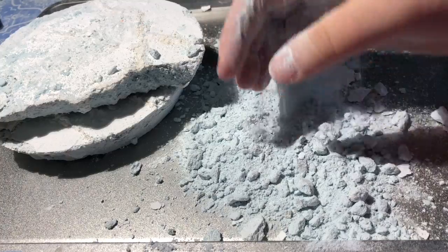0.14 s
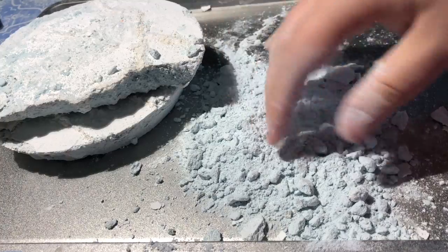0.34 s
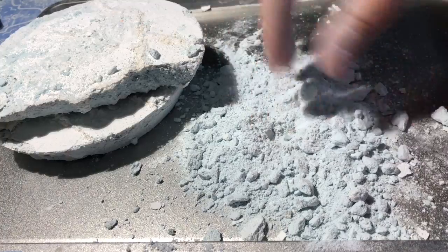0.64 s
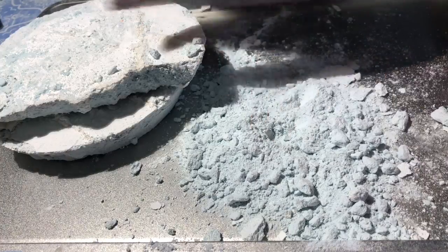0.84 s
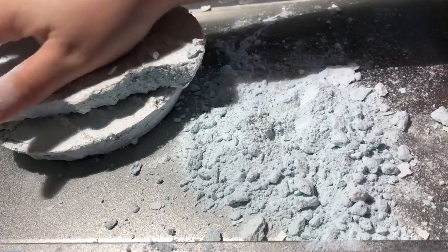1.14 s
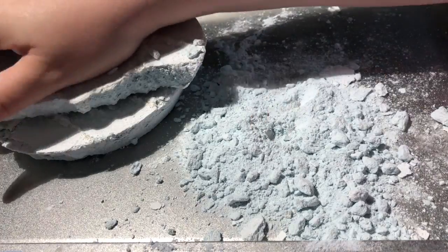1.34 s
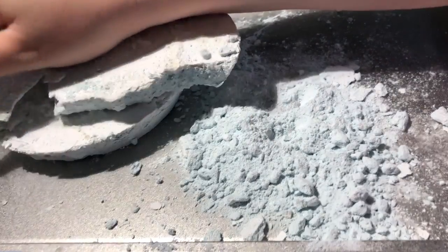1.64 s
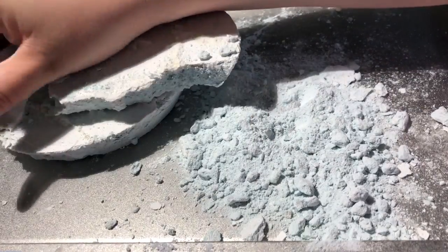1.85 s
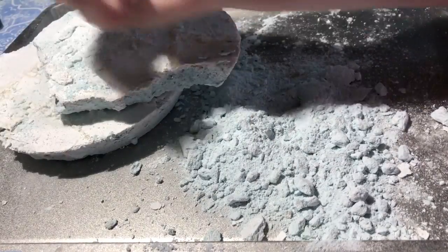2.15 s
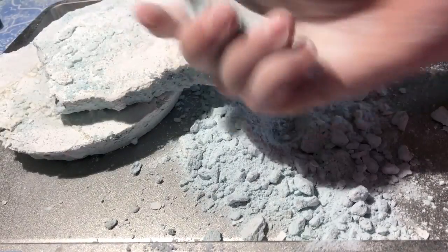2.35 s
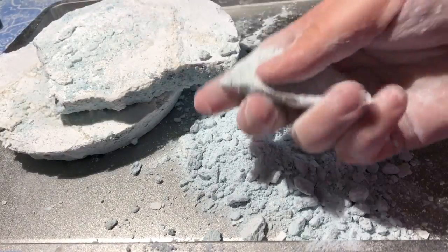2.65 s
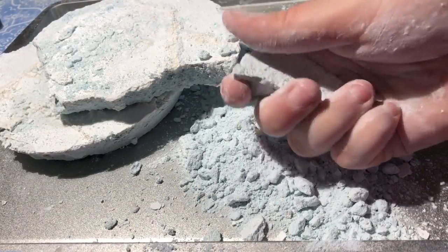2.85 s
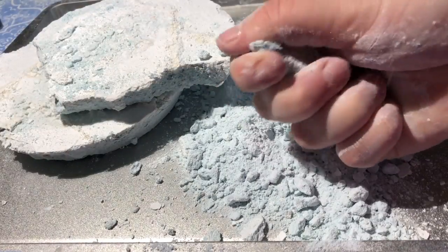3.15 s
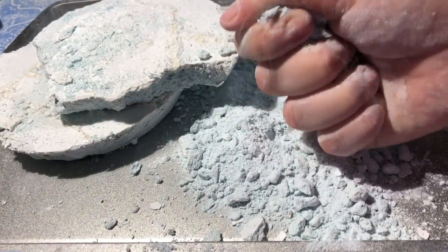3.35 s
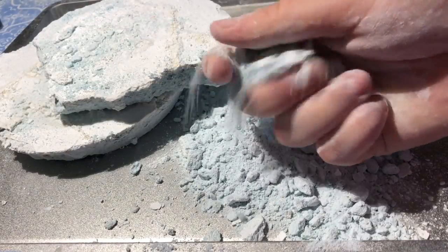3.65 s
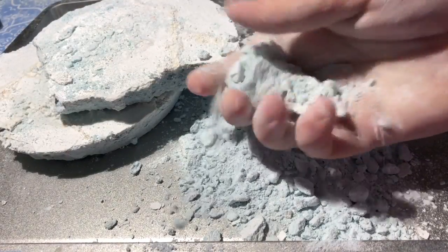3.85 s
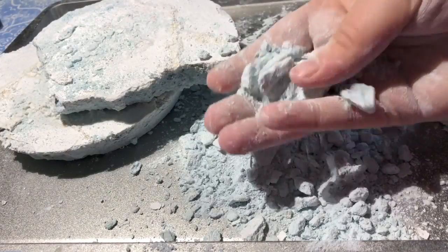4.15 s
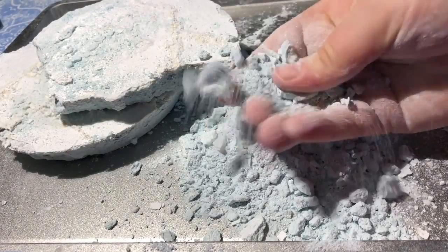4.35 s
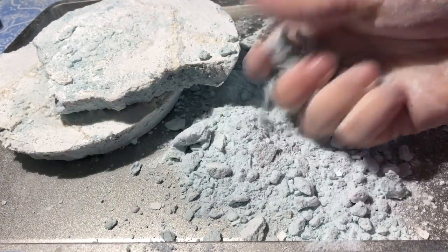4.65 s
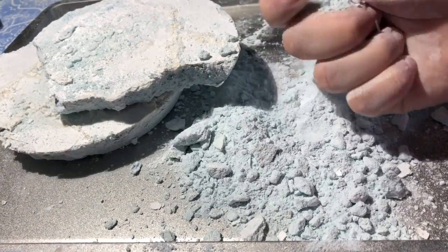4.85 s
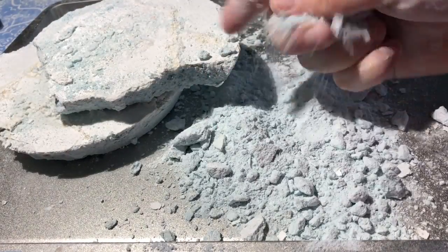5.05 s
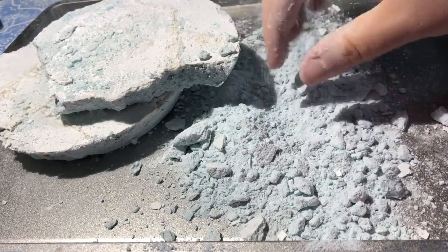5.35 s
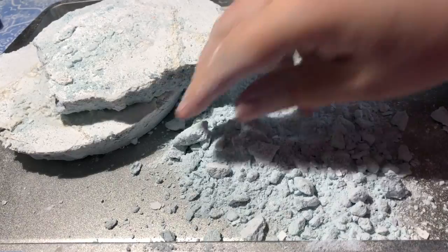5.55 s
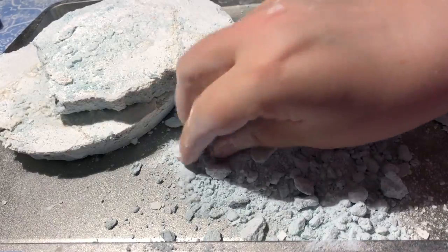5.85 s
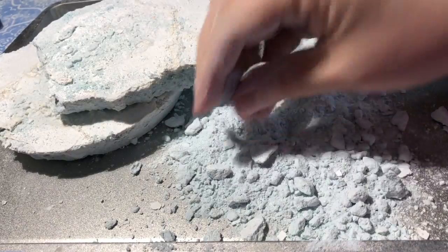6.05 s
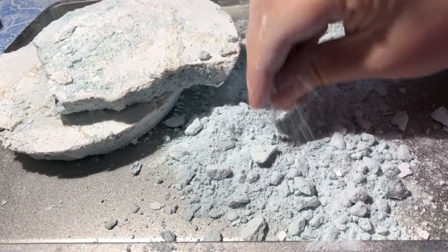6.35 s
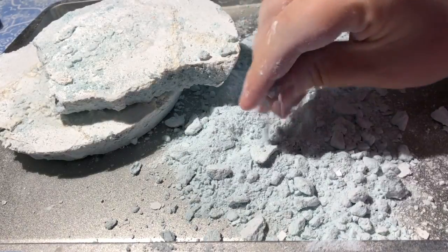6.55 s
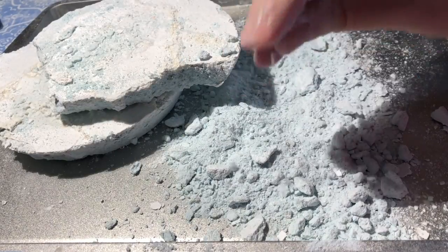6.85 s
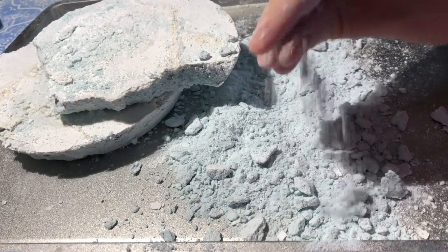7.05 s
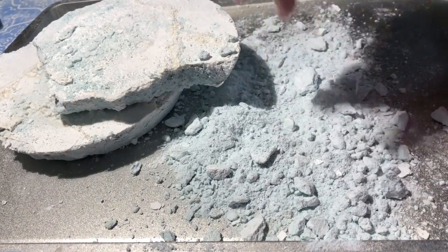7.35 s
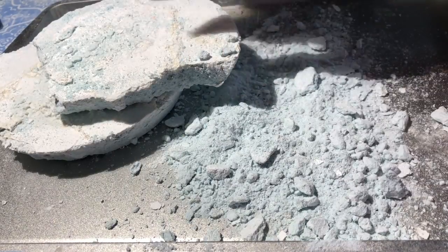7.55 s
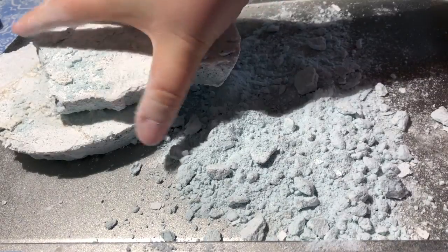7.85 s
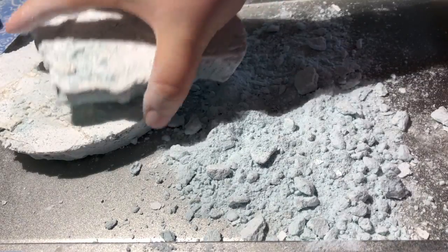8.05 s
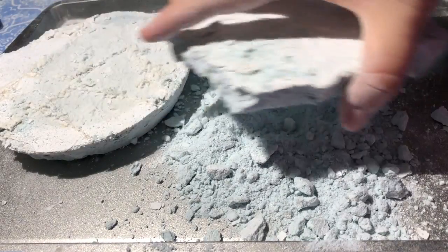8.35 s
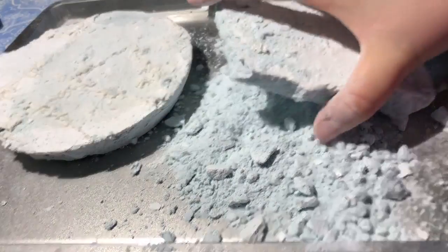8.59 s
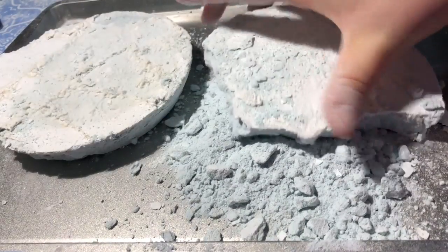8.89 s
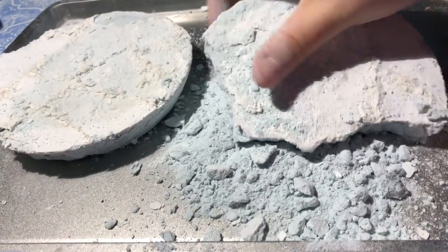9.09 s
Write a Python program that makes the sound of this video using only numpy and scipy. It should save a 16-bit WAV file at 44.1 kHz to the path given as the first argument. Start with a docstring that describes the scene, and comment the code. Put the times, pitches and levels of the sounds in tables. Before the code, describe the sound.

Hands lift, crush and crumble a slab of dry pressed powder over a metal tray, with gritty crunches, pattering crumbs and sharp knocks.

```python
"""At a metal tray in a small room, microphone just over it: hands lift a slab of dry pressed powder, snap and crush it.
Powder hisses on the skin and in the cupped fist: noise of fine grains through the resonances of the hand's hollow.
Crumbs crack, drop and knock: crumbling shocks through broad resonances, with treble chips and a ring of the tray.
Pours and drags are streams of grains, coarse and fine, over a low shudder; the slab's weight thumps low tray modes.
The room's echo and its low steady noise lie underneath."""
import sys
import numpy as np
from scipy import signal
from scipy.fft import rfft, irfft
from scipy.io import wavfile
from scipy.ndimage import uniform_filter1d

SR = 44100
rng = np.random.default_rng(int(sys.argv[2]) if len(sys.argv) > 2 else 0)


def to_wav(sig):
    """Store sig (one row per channel, or 1-D mono) as 16-bit WAV at the path in sys.argv[1].

    Samples outside -1..1 are clipped; the rate is SR.
    """
    pcm = np.clip(np.atleast_2d(sig), -1, 1) * 32767
    pcm = np.round(pcm).astype(np.int16)
    wavfile.write(sys.argv[1], SR, pcm.T)  # frames by channels


N = 406587
TIME = np.arange(N) / SR


def amp(db):
    """Decibels to gain."""
    return 10 ** (np.asarray(db) / 20)


def evened(x):
    """Scales to rms 1."""
    return x / np.sqrt(np.mean(x ** 2) + 1e-20)


def levelled(sound, db, over_s):
    """Gives a short sound the energy of a level db held for over_s."""
    return amp(db) * sound / np.linalg.norm(sound) * np.sqrt(over_s * SR)


def read(points, hz):
    """Reads a spectrum table on a log-frequency axis."""
    f, value = np.transpose(points)
    return np.interp(np.log(hz + 1), np.log(f), value)


def add(mix, s, sound):
    """Mixes a sound in at time s."""
    part = mix[max(round(s * SR), 0):][:len(sound)]
    part += sound[:len(part)]


def during(span):
    """1 within a span of time, 0 outside, with soft edges."""
    inside = (TIME > span[0]) & (TIME < span[1])
    return uniform_filter1d(1. * inside, size=1024)


def stroke(length, rise, growth_db, release):
    """Envelope of one movement: it rises, holds while growing or easing, and dies away."""
    t = np.arange(0, length + 6 * release, 1 / SR)
    hold = amp(growth_db * (np.minimum(t / length, 1) - .5))
    return np.minimum(t / rise, 1) * hold * np.exp(-np.maximum(t - length, 0) / release)


def waver(depth_db, per_s):
    """An unsteady gain: random levels at per_s points a second, joined by straight lines in dB."""
    knots = np.arange(0, N / SR + 1, 1 / per_s)
    return amp(depth_db * np.interp(TIME, knots, rng.standard_normal(len(knots))))


def grains(per_s, spread_db):
    """A random train of clicks, most small and a few large, at rms 1."""
    size = amp(spread_db * np.minimum(rng.exponential(1, N), 4))
    sign = rng.choice([-1, 1], N)
    return evened(size * sign * (rng.random(N) < per_s / SR))


def patchy(x, depth_db, size=512):
    """Lets the colour drift from moment to moment as the points of contact change."""
    z = signal.stft(x, nperseg=size)[2]
    across_pitch = uniform_filter1d(rng.standard_normal(z.shape), size=9, axis=0)
    drift = evened(uniform_filter1d(across_pitch, size=7, axis=1))
    return signal.istft(z * amp(depth_db * drift), nperseg=size)[1][:N]


def colour(x, spectrum, extra_db=0, size=4096):
    """Causal filter: attacks stay sharp and the ringing comes after them."""
    log_gain = np.log(amp(read(spectrum, abs(np.fft.fftfreq(size, 1 / SR))) + extra_db))
    taps = np.fft.ifft(np.exp(np.conj(signal.hilbert(log_gain)))).real  # minimum phase
    return signal.fftconvolve(x, taps[:size // 2])[:len(x)]


def resonate(x, hz, width):
    """A double resonance of gain 1 whose pitch can follow a curve."""
    turn = np.exp(2j * np.pi * np.cumsum(hz * np.ones(len(x))) / SR)
    r = np.exp(-np.pi * width / SR)
    # shift the pitch to zero, smooth twice, shift back
    smooth = signal.lfilter([(1 - r) ** 2], np.poly([r, r]), x / turn + 1e-18)
    return 2 * (turn * smooth).real


def ringing(modes, t):
    """Dying sines of unit energy."""
    sound = sum(amp(db - 60 * t / t60) * np.sin(2 * np.pi * (hz * t + rng.random())) for hz, db, t60 in modes)
    return sound / np.linalg.norm(sound)


def crumble(length, first=0, size=2048):
    """A first shock and a run of tiny fractures that swells and dies, with even power at all pitches."""
    t = np.arange(size) / SR
    swell = (1 - np.exp(-t / 0.00052)) * np.exp(-(t / max(1.51 * length, .0005)) ** 1.4)
    run = rng.standard_normal(size) * swell
    z = rfft(run / np.linalg.norm(run)) + first
    even = irfft(z / np.sqrt(uniform_filter1d(abs(z) ** 2, size=31)))
    return np.roll(even, 20) * (t < t[-1] / 2)  # keeps the soft lead-in before the shock


# Colour of a blow's body and of its chips.
# Each row: frequency in Hz, relative density in dB per Hz.
BLOW_SPECTRUM = [(100, -15.5), (350, 4.5), (600, 1), (1000, 2.5), (1300, -5.5), (1850, -4), (2400, -9.5),
                 (3300, -4.5), (4500, 0.5), (6000, -6), (8500, -10), (16000, -37.5)]
CHIP_SPECTRUM = [(500, -21), (2500, -15.5), (6000, 6), (9000, 1), (15500, 0.5)]
# a piece radiates little below this share of its pitch, or below this pitch at most
BASS_SHARE, BASS_TOP_HZ = 0.61, 620


def strike(db, hz, chip_db, length, sharpness, first, reach, spread, size=4096):
    """One contact: a first shock and its crumbling ring a broad resonance, while chips spit treble."""
    f = abs(np.fft.fftfreq(size, 1 / SR)) + 1
    resonance_db = -10 * np.log10(1 + (sharpness * (f / hz - hz / f)) ** 2)
    # the contact time cuts off the treble, and a small piece radiates little bass
    treble_loss = (f / (reach * hz)) ** 6
    bass_loss = (min(BASS_SHARE * hz, BASS_TOP_HZ) / f) ** 7
    cushion_db = -10 * np.log10(1 + treble_loss + bass_loss)
    shock, spit = crumble(length, first), crumble(0.8 * length)
    body = colour(shock, BLOW_SPECTRUM, np.maximum(resonance_db + cushion_db, -70))
    chips = colour(spit, CHIP_SPECTRUM)
    # bending waves are faster at high pitch, so the bass comes last
    body = irfft(rfft(body) * np.exp(-1j * spread * np.sqrt(np.fft.rfftfreq(len(body), 1 / SR))))
    return levelled(evened(body) + amp(chip_db) * evened(chips), db, over_s=.005)


# Clear modes of the sheet metal, damped by powder.
# Each row: nominal frequency in Hz, mean relative level in dB, t60 in seconds.
SHEET_MODES = [(766, -5, 0.13), (972, -3, 0.204), (1122, -7, 0.24), (1510, -4.5, .16), (1737, -1.5, 0.2),
               (1845, -2.5, 0.12), (2010, -4.5, 0.16), (2470, -12, 0.25), (3240, -6, 0.1),
               (3670, 0.5, 0.053), (4220, -6, 0.21), (4620, -4, 0.19), (4960, -7.5, 0.249)]
# The sheet's crowd of weak modes. Each row: frequency in Hz, relative density in dB per Hz.
SHEET_SPECTRUM = [(200, -30.5), (600, -8.5), (1100, -5), (1400, -1.5), (2000, 3.5), (2500, -12),
                  (5000, -14.5), (16000, -48)]
SHEET_T60_S = 0.062
SPOT_DB, SPOT_DETUNE = 3, .03  # random spread of mode levels, largest shift of their pitch as a share


def on_tray(x, ring_db, sheet_db):
    """A sound and the brief ring of the sheet metal at one spot: a few clear modes over a crowd of weak ones."""
    t = np.arange(SR // 4) / SR
    # each spot favours other modes, and its load of powder shifts them
    modes = [(hz * (1 + SPOT_DETUNE * rng.uniform(-1, 1)), db + SPOT_DB * rng.standard_normal(), t60)
             for hz, db, t60 in SHEET_MODES]
    sheet = colour(rng.standard_normal(len(t)) * amp(-60 * t / SHEET_T60_S), SHEET_SPECTRUM)
    answer = amp(ring_db) * ringing(modes, t) + amp(sheet_db) * sheet / np.linalg.norm(sheet)
    return signal.fftconvolve(x, (t == 0) + answer)[:N]


# Colour of the room's noise. Each row: frequency in Hz, relative density in dB per Hz.
AIR_SPECTRUM = [(20, -23), (40, -5.5), (65, -1.5), (130, 1), (250, -5), (500, -12), (1000, -18.5),
                (2500, -25), (6000, -28), (10000, -32), (15500, -33.5)]
AIR_DB = -66  # ahead of the microphone's bass cut


def air():
    """The low steady noise of the room: coloured random noise."""
    return amp(AIR_DB) * evened(colour(rng.standard_normal(N), AIR_SPECTRUM))


# Loose crumbs pour on to the heap.
# Each row: start in seconds, length in seconds, level in dB of the fine crumbs half way through.
POURS = [(0.0, 0.058, -67), (0.15, 0.12, -63), (0.364, 0.13, -70.5), (3.28, 0.079, -62.5),
         (3.568, 0.13, -69), (3.77, 0.16, -61.5), (4.046, 0.081, -66.5), (4.362, 0.093, -63.5),
         (4.465, 0.034, -58), (4.525, 0.036, -56), (4.606, 0.028, -64.5), (4.995, 0.035, -63),
         (5.05, 0.096, -63), (5.239, 0.21, -51), (5.354, 0.044, -46), (5.454, 0.051, -61),
         (6.943, 0.04, -72)]
POUR_RISE_SHARE, POUR_SAG_DB, POUR_RELEASE_S = 0.45, -4, 0.056
POUR_DUST_DB, POUR_RUMBLE_DB, POUR_PEBBLE_DB = -10.5, -19, -3.5  # dust, tray shudder, coarse crumbs re fine ones
# Slab or fingers drag over cake and tray. Each row: start in seconds, length in seconds, then half way through
# the grit in dB, powder hiss in dB and tray rumble in dB, and last the growth over the drag in dB.
SCRAPES = [(0.499, 0.11, -65, -63, -94, 6), (1.097, 0.061, -64, -56.5, -64, 0.5),
           (1.457, 0.04, -75, -54, -64.5, 16.5), (1.534, 0.11, -53.5, -54, -56, 18.5),
           (1.657, 0.13, -59, -62.5, -50, -13), (1.808, 0.15, -76, -64.5, -70, -7),
           (1.918, 0.051, -75, -55.5, -77, -3), (5.72, 0.057, -60.5, -64, -60, -2),
           (5.792, 0.1, -55.5, -59.5, -62.5, -8), (5.904, .06, -61, -62.5, -70, 4),
           (5.98, 0.096, -72.5, -69, -82.5, 1), (7.802, 0.17, -71.5, -65.5, -72, -16),
           (8.004, 0.035, -70, -62, -86, -2), (8.083, 0.043, -71.5, -67, -75, -1),
           (8.618, 0.036, -52.5, -57, -61, 5), (8.674, 0.11, -56.5, -63.5, -59.5, 3),
           (8.811, 0.078, -55.5, -61.5, -60.5, 10), (8.913, 0.13, -59.5, -64, -60, -13.5),
           (9.083, 0.12, -68, -72, -68.5, -3), (9.191, .06, -60, -56.5, -63, -2)]
SCRAPE_RISE_S, SCRAPE_RELEASE_S = 0.017, 0.023
SCRAPE_PEBBLE_DB = -9.5  # coarse crumbs crushed in a drag, re its grit


def movements():
    """Strength of grit, powder hiss, tray rumble and coarse crumbs, all driven by scrapes and pours."""
    power = np.zeros((4, N))
    for s, length, grit_db, hiss_db, rumble_db, growth_db in SCRAPES:
        drag = stroke(length, SCRAPE_RISE_S, growth_db, SCRAPE_RELEASE_S)
        for layer, db in zip(power, (grit_db, hiss_db, rumble_db, grit_db + SCRAPE_PEBBLE_DB)):
            add(layer, s, (amp(db) * drag) ** 2)
    for s, length, db in POURS:
        flow = amp(db) * stroke(length, POUR_RISE_SHARE * length, POUR_SAG_DB, POUR_RELEASE_S)
        for layer, share_db in zip(power, (0, POUR_DUST_DB, POUR_RUMBLE_DB, POUR_PEBBLE_DB)):
            add(layer, s, (amp(share_db) * flow) ** 2)
    return np.sqrt(power)


# Pitches of large to small crumbs. Each entry: frequency in Hz.
CRUMB_HZ = [820, 950, 1460, 1980, 3092, 4820]
# Colour of the trickling grit. Each row: frequency in Hz, relative density in dB per Hz.
GRAVEL_SPECTRUM = [(150, -3.5), (450, 1.5), (800, 3), (1100, -4), (1400, -2), (1850, -5.5), (2500, -5),
                   (4500, -5), (6500, -12), (10000, -33.5), (16000, -29)]


def trickle(strength):
    """Crumbs patter on the tray, each size with its own pitch, over a dense bed of grinding grit."""
    crumbs = np.zeros(N)
    for hz in CRUMB_HZ:
        patter = grains(per_s=330, spread_db=3.1)
        crumbs += signal.lfilter(*signal.iirpeak(hz, 2.4, fs=SR), patter)
    grit = evened(crumbs) + 1.2 * grains(per_s=9000, spread_db=2)
    gravel = evened(colour(patchy(grit, depth_db=2.5), GRAVEL_SPECTRUM))
    return strength * gravel * waver(depth_db=1.6, per_s=38)


PEBBLE_HZ = (850, 5500)  # pitch range of coarse crumbs
PEBBLES_PER_S, PEBBLE_SPREAD_DB = 330, 2.6  # rate over all pitches together


def pebbles(strength):
    """Coarse crumbs tick out of a pour or crunch under a drag, each a few cycles at its own pitch."""
    ticks, pitches = np.zeros(N), np.geomspace(*PEBBLE_HZ, num=9)
    for hz in pitches:
        b, a = signal.iirpeak(hz, 2.5, fs=SR)
        clicks = grains(PEBBLES_PER_S / len(pitches), PEBBLE_SPREAD_DB)
        # the resonance is applied twice
        ticks += evened(signal.lfilter(np.convolve(b, b), np.convolve(a, a), clicks))
    return strength * evened(ticks)


# Colour of the tray's shudder. Each row: frequency in Hz, relative density in dB per Hz.
RUMBLE_SPECTRUM = [(35, -14), (65, -0.5), (130, 3), (230, -2), (320, -2.5), (450, -13.5), (3000, -63)]


def rumble(strength):
    """The tray shudders under pours, hands and the dragged slab: low noise that follows their strength."""
    return strength * evened(colour(rng.standard_normal(N), RUMBLE_SPECTRUM))


# Lumps land, and some cracks in the fist give a low knock. Each row: start in seconds,
# level in dB over 5 ms before the tray rings, pitch of the contact in Hz, length scale of the contact in seconds.
KNOCKS = [(0.0636, -55, 1050, 0.0019), (0.1852, -55.5, 1580, .0024), (0.221, -49.5, 1590, 0.0011),
          (0.2318, -48, 1260, 0.0027), (0.2725, -54, 2040, 0.0011), (0.4208, -55, 1780, 0.0019),
          (1.694, -39, 450, 0.0015), (3.085, -52, 440, 0.00075), (3.181, -52, 455, 0.0012),
          (3.3424, -43, 476, 0.0013), (3.7962, -54, 1590, .0026), (3.8313, -49.5, 2330, 0.0037),
          (3.8538, -46, 1570, 0.0067), (3.8664, -50, 1210, .0015), (3.881, -39.5, 1080, 0.0015),
          (3.9305, -50, 1390, 0.0034), (3.9405, -58, 1300, .002), (4.0514, -45.5, 2040, 0.0037),
          (4.0972, -55.5, 2570, .003), (4.3268, -41.5, 3300, 0.0021), (4.3675, -47.5, 2570, 0.0032),
          (4.3996, -44, 1250, 0.0021), (4.4846, -32, 1040, 0.0021), (4.5175, -43, 1030, 0.00066),
          (4.5409, -41.5, 1260, 0.002), (4.556, -35.5, 466, 0.0017), (4.9911, -36, 1590, 0.0014),
          (5.272, -47, 2610, 0.0021), (5.308, -42.5, 1220, 0.0028), (5.3336, -38.5, 3210, 0.0025),
          (5.364, -26.5, 2850, 0.0017), (5.3682, -19.5, 1190, 0.0021), (5.392, -38.5, 2380, .003),
          (5.4074, -25, 3700, 0.0017), (5.423, -41.5, 1500, 0.0018), (5.4892, -46.5, 1280, 0.0015),
          (5.74, -53, 700, 0.0041), (5.7686, -46.5, 1400, 0.0065), (5.797, -55, 1050, .002),
          (5.915, -54, 1050, 0.0035), (5.988, -56.5, 1590, 0.0019), (6.033, -64, 1900, 0.0014),
          (6.044, -58.5, 1695, .0015), (6.963, -61, 2200, 0.0022), (7.155, -56.5, 992, .003),
          (7.2977, -40, 840, 0.0012), (7.3038, -52, 850, .001), (8.6286, -41, 1630, 0.0021),
          (8.6446, -36.5, 597, 0.0033), (8.877, -48.5, 1200, 0.0036), (8.8872, -44, 900, 0.0056),
          (8.895, -42.5, 620, 0.0074)]
# chipping of a knock, re its body: high-pitched, light ones chip most
KNOCK_HZ, KNOCK_DB, KNOCK_CHIP_DB = 1200, -42.5, -23
CHIP_DB_PER_OCTAVE, CHIP_DB_PER_DB = 9.5, -0.5


def knocks():
    """Lumps land, and some cracks in the fist give a low knock: a low pitch is duller and chips less."""
    out = np.zeros(N)
    for s, db, hz, length in KNOCKS:
        octaves = np.log2(hz / KNOCK_HZ)
        chip_db = KNOCK_CHIP_DB + CHIP_DB_PER_OCTAVE * octaves + CHIP_DB_PER_DB * (db - KNOCK_DB)
        blow = strike(db, hz, chip_db, length, sharpness=0.72, first=.7, reach=2.04, spread=0.303)
        add(out, s, on_tray(blow, ring_db=-29.5, sheet_db=-23))
    return out


# The pressed powder fractures. Each row: start in seconds, level in dB over 5 ms before tray and fist ring,
# pitch in Hz, chipping in dB re the body, length scale of the fracture in seconds.
CRACKS = [(0.2526, -45, 4040, -2, 0.0021), (1.23, -55, 3450, -20, 0.0067), (1.295, -52, 6400, 12, .0018),
          (1.5013, -43.5, 1870, 14, 0.0026), (1.5482, -44, 4160, 0, 0.0038),
          (1.607, -40.5, 3540, -12, .0029), (1.742, -58, 3500, 3, .0015),
          (1.7835, -56.5, 4340, -15, 0.0014), (2.266, -57, 4870, 22, .005),
          (2.8995, -53.5, 5880, 26, .0038), (3.0843, -48, 2070, 0.5, 0.0022),
          (3.149, -51.5, 4540, 7, 0.0041), (3.181, -50, 1850, 3, 0.0044), (3.204, -52.5, 2630, -3, 0.0043),
          (3.281, -54.5, 2240, -6, 0.0015), (3.2998, -52, 2550, 2, 0.0041), (3.307, -48, 2320, -3, .0044),
          (3.326, -41, 2690, -6, .0026), (3.34, -36, 2170, -6.5, 0.0012), (4.05, -39.5, 3760, -0.5, 0.0042),
          (4.3212, -53, 3500, -9, 0.0016), (4.4762, -50.5, 5000, -12, 0.0026),
          (4.5282, -59, 5500, 4, .0007), (4.534, -54, 3100, -12, 0.0007),
          (4.555, -42.5, 1900, -10.5, 0.0044), (4.602, -60, 2650, -14, .0007),
          (5.143, -49, 3130, -12, 0.00095), (5.214, -57.5, 3373, -3.5, .0025), (5.2885, -53, 4500, 1, .002),
          (5.3208, -42, 3270, 0.5, 0.0018), (5.368, -26, 3390, -22, 0.002), (5.44, -43.5, 3030, -2, 0.0034),
          (6.5037, -52, 3300, -3, 0.0051), (6.821, -51.5, 3480, -3, 0.0027), (7.172, -58, 3210, 4, 0.0015),
          (7.2982, -60, 2670, -16, 0.0023), (7.764, -61, 4360, -3.5, 0.0024),
          (8.0245, -54, 3020, -12, .004), (8.0391, -53, 3020, -8, 0.0024),
          (8.1385, -54.5, 3380, -2, 0.0029), (8.6425, -33.5, 2350, -8, 0.0032),
          (8.743, -48.5, 3450, -2, 0.0013), (9.0349, -45, 5440, 8, 0.0078)]
CLENCH_S = (3.08, 3.45)  # the fist is shut from, to
FIST_HZ, FIST_DB = 2740, 7.5  # its hollow rings with the fractures


def fractures():
    """The cake gives way: a weaker first shock and a narrower resonance than a knock; the shut fist rings along."""
    out = np.zeros(N)
    for s, *row in CRACKS:
        crack = strike(*row, sharpness=0.93, first=0.36, reach=1.74, spread=0.082)
        add(out, s, on_tray(crack, ring_db=-27.5, sheet_db=-23.5))
    return out + amp(FIST_DB) * during(CLENCH_S) * resonate(out, FIST_HZ, width=1170)


# Colour of powder on skin. Each row: frequency in Hz, relative density in dB per Hz.
SKIN_SPECTRUM = [(200, -25.5), (700, -2), (1500, -1.5), (3000, 2.5), (5000, 1), (7000, 2.5), (9000, -0.5),
                 (12000, -2), (15500, 2)]
# A finger strokes the powder. Each row: start in seconds, length in seconds, level in dB half way through,
# resonance of the hand's hollow in Hz at that moment, level of the hollow in dB re the stroke.
RUBS = [(1.173, 0.089, -65, 4000, -19), (1.223, 0.16, -55.5, 6400, -14), (2.2, 0.017, -59, 5000, -12),
        (2.328, 0.066, -61, 3730, -6.5), (2.435, 0.064, -56, 2930, -11), (2.55, 0.11, -61, 2840, -11),
        (2.67, 0.053, -67.5, 2920, -34), (2.754, 0.035, -66, 3100, -16), (2.844, 0.11, -68, 2900, -5),
        (3.025, 0.14, -67, 2700, -22), (3.188, 0.065, -62.5, 2740, -5.5), (3.275, 0.15, -59.5, 3020, -5),
        (3.509, 0.26, -61.5, 2950, -6.5), (4.036, .07, -63, 3820, -8), (4.15, 0.083, -65, 3430, -5),
        (4.314, 0.014, -56.5, 3280, -8), (4.396, 0.24, -62, 2900, -14), (4.695, 0.052, -61, 2980, -6.5),
        (4.784, 0.065, -58, 3060, -4), (4.853, 0.11, -62, 2840, -12), (4.988, 0.065, -52, 3130, -8.5),
        (5.07, 0.076, -54.5, 3150, -11), (5.27, 0.22, -58, 4300, -7), (6.225, 0.16, -65, 3260, -37),
        (6.485, 0.077, -58.5, 2900, -11), (6.611, 0.094, -62, 2920, -31), (6.78, 0.083, -70, 2740, -11),
        (6.925, 0.13, -61, 2390, -21), (7.112, 0.093, -59, 2610, -26), (7.21, 0.046, -60, 6030, -14),
        (7.631, 0.017, -65.5, 3000, -17), (7.808, 0.025, -62.5, 2920, 1), (7.83, 0.14, -71.5, 2870, -1),
        (9.009, 0.03, -55.5, 5100, -14)]
# a stroke swells over part of its length, eases, lets go
RUB_RISE_SHARE, RUB_SAG_DB, RUB_RELEASE_S = 0.455, -4.5, 0.028
HANDLING_S, HANDLING_DB = (1.15, 7.3), -73.5  # over that span powder clings to the moving hand
BURSTS_PER_S, BURST_SPREAD_DB, BURST_DB = 170, 4, -9.5  # grains that burst under the fingers; level re the slips
HOLLOW_GLIDE = -0.073  # the hollow's pitch drifts by this share over a stroke
HOLLOW_UPPER, HOLLOW_UPPER_DB = 1.42, -12  # its second resonance: pitch ratio, gain


def rubbing(hiss):
    """Countless fine grains slip on the skin and a few burst; the hand's hollow rings with each finger stroke."""
    slips = patchy(grains(per_s=20000, spread_db=2.5), depth_db=1.5) * waver(depth_db=3.0, per_s=97)
    burst_clicks = grains(BURSTS_PER_S, BURST_SPREAD_DB)
    bursts = evened(signal.fftconvolve(burst_clicks, crumble(length=0.0011))[:N])
    slips = evened(slips) + amp(BURST_DB) * bursts
    skin = evened(colour(slips, SKIN_SPECTRUM))
    handling = amp(HANDLING_DB) * during(HANDLING_S)
    power, hollows = hiss ** 2 + handling ** 2, np.zeros(N)
    for s, length, db, hz, hollow_db in RUBS:
        press = amp(db) * stroke(length, RUB_RISE_SHARE * length, RUB_SAG_DB, RUB_RELEASE_S)
        slip = slips[round(s * SR):][:len(press)]
        progress = np.minimum(np.arange(len(slip)) / SR / length, 1)
        pitch = hz * (1 + HOLLOW_GLIDE * (progress - .5))
        lower = resonate(slip, pitch, width=1100)
        upper = resonate(slip, HOLLOW_UPPER * pitch, width=1600)
        hollow = evened(lower + amp(HOLLOW_UPPER_DB) * upper)
        add(power, s, press ** 2)
        add(hollows, s, amp(hollow_db) * press[:len(hollow)] * hollow)
    return np.sqrt(power) * skin + hollows


# A weight sets the whole tray swaying.
# Each row: start in seconds, level in dB over 40 ms, softness of the blow in seconds.
THUMPS = [(1.197, -59.5, 0.0082), (1.511, -38, 0.0017), (1.604, -45, 0.002), (1.694, -38, 0.0004),
          (2.054, -59, 0.00086), (3.344, -53.5, 0.00015), (3.885, -54.5, 0.011), (4.33, -63.5, 0.0007),
          (4.56, -50, 0.00035), (5.371, -57.5, 0.0003), (7.303, -56, 0.0003), (7.98, -61, 0.0073),
          (8.642, -36, 0.0012), (8.896, -46.5, 0.0018)]
# Low modes of the loaded tray.
# Each row: frequency in Hz, relative level in dB before the blow's softness, t60 in seconds.
SWAY_MODES = [(60.8, -7, 0.27), (70.95, -6.5, 0.27), (95, -5.5, .16), (128.6, -1.5, 0.2),
              (149.5, -5, 0.078), (198, -1, 0.17), (219.7, 3, 0.094), (265.7, -2, .15), (318, 7, 0.1),
              (457, -10, 0.13)]


def thumps():
    """The tray's low modes swell, more slowly under a soft blow, which also spares the higher ones."""
    out, t = np.zeros(N), np.arange(SR // 2) / SR
    for s, db, soft in THUMPS:
        modes = [(hz, mode_db - 10 * np.log10(1 + (2 * np.pi * hz * soft) ** 2), t60)
                 for hz, mode_db, t60 in SWAY_MODES]
        sway = ringing(modes, t) * (1 - np.exp(-t / (4 * soft)))
        add(out, s, levelled(sway, db, over_s=.04))
    return out


# The slab rocks on the cake beneath it, cushioned by powder. Each row: start in seconds,
# level in dB over 5 ms before the tray rings, pitch in Hz, length scale of the contact in seconds.
ROCKS = [(1.5058, -37, 1640, 0.0025), (1.6898, -28.5, 1900, 0.002)]
ROCK_CHIP_DB = -31  # re the body


def rocking():
    """Dull knocks of the heavy slab: the powder takes away their treble, the tray rings on."""
    out = np.zeros(N)
    for s, db, hz, length in ROCKS:
        blow = strike(db, hz, ROCK_CHIP_DB, length, sharpness=1.2, first=.8, reach=1.35, spread=.4)
        add(out, s, on_tray(blow, ring_db=-27.5, sheet_db=-17.5))
    return out


# Decay of the small room. Each row: frequency in Hz, t60 in seconds.
ROOM_DECAY = [(150, 0.29), (5000, .22), (9000, 0.0748), (16000, 0.097)]
HITS_ROOM_DB, FINE_ROOM_DB = -21, -25  # sent to the room


def room(x):
    """A small room answers: noise that swells briefly, then dies at its own rate at each pitch."""
    hz, t, z = signal.stft(rng.standard_normal(SR // 2), SR, nperseg=256)
    decay = amp(-60 * t / read(ROOM_DECAY, hz)[:, None])
    treble_loss = np.hypot(1, hz / 8000)[:, None]
    tail = signal.istft(z * decay / treble_loss, SR, nperseg=256)[1]
    tail = tail * (1 - np.exp(-np.arange(len(tail)) / SR / 0.009))
    return signal.fftconvolve(x, tail / np.linalg.norm(tail))[:N]


def scene():
    """All sources, heard from one point just over the tray."""
    grit, hiss, shudder, coarse = movements()
    hits = knocks() + rocking() + fractures()
    fine = on_tray(rubbing(hiss) + trickle(grit) + pebbles(coarse), ring_db=-23.5, sheet_db=-21.5)
    echoes = room(amp(HITS_ROOM_DB) * hits + amp(FINE_ROOM_DB) * fine)
    return (hits + fine + echoes + thumps() + rumble(shudder) + air())[None]


EDGE_HZ = 16000  # the recorder's upper band limit


def record(dry):
    """The microphone's bass cut and the recorder's band limit."""
    bass_cut = signal.butter(N=3, Wn=42, btype="high", fs=SR, output="sos")
    thinned = signal.sosfilt(bass_cut, dry)
    band_limit = signal.firwin(401, EDGE_HZ, window=("kaiser", 8), fs=SR)
    return signal.oaconvolve(thinned, band_limit[None], "same")


dry = scene()
out = record(dry)
to_wav(out)
```